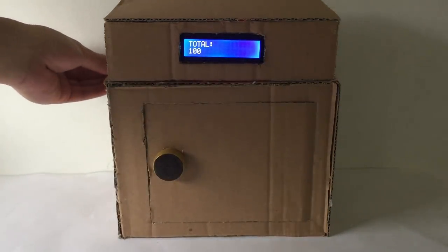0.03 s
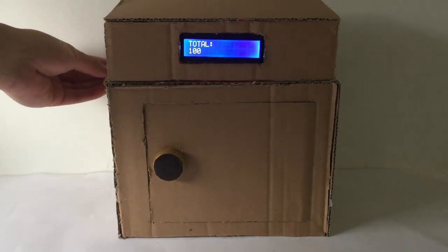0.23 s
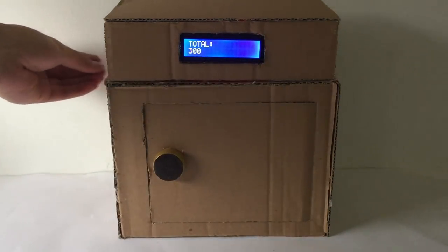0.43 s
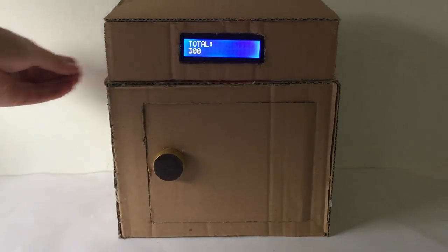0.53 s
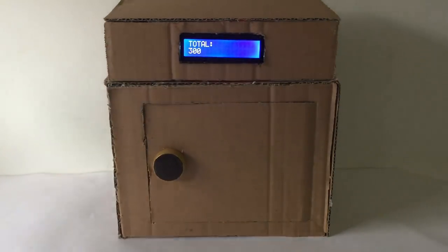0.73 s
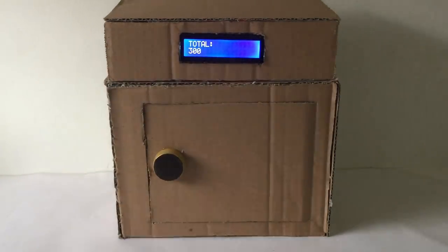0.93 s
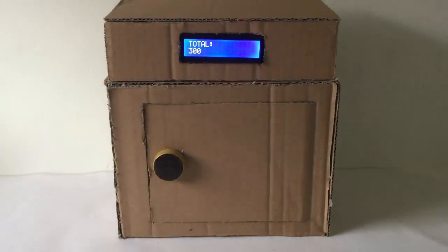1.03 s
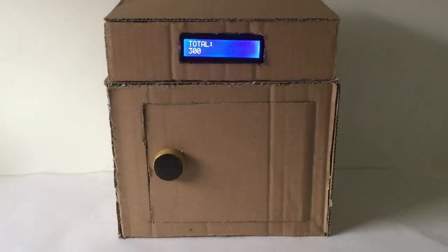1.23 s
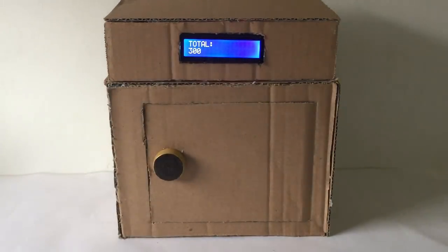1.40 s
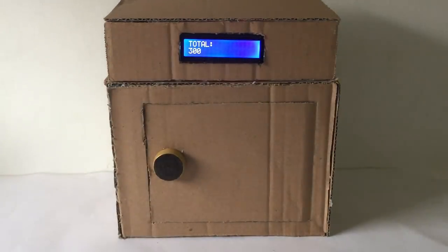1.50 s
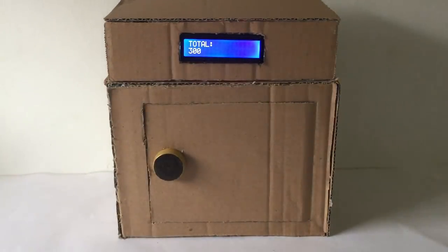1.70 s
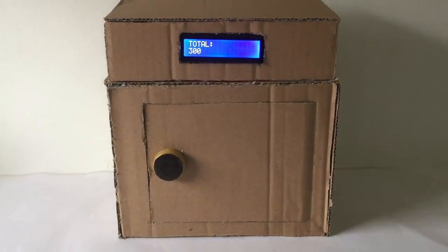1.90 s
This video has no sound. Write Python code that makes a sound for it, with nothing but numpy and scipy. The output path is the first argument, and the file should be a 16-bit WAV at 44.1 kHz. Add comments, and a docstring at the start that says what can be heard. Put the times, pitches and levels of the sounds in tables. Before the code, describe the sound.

In a small, quiet room, a coin drops into a nearby cardboard box. A soft finger thump comes first, then a quick double clack and a short metallic rattle as the coin settles, leaving faint rumble and hiss.

```python
"""A finger bumps a cardboard money box, then a coin pushed through the slot clacks inside.
The coin strikes hard twice, rings very high, skitters and falls flat, which damps the ring.
Each impact excites the cardboard and the air cavity. Low rumble and hiss of a quiet room lie
underneath; a few far tones, faint ticks and a last soft bump come at the end."""
import sys
import numpy as np
from scipy import signal
from scipy.fft import irfft
from scipy.io import wavfile
from scipy.ndimage import uniform_filter1d

SR = 44100
rng = np.random.default_rng(int(sys.argv[2]) if len(sys.argv) > 2 else 0)


def unload_audio(sound):
    """Save the sound as a 16-bit wav file, at the path given as the first command line argument."""
    columns = np.transpose(np.atleast_2d(sound))
    # keep every value between -1 and 1, then stretch to whole-number steps
    steps = np.round(np.clip(columns, -1, 1) * 32767)
    wavfile.write(sys.argv[1], SR, steps.astype(np.int16))


N = 85995
T = np.arange(N) / SR

# dense small resonances of the cardboard: freq_hz, density_db
CLACK_SPECTRUM = [(30, -51.5), (90, -25), (170, -20), (400, 0), (650, -4.5), (1050, -1), (1450, -11),
                  (2350, 1), (3100, -6.5), (3700, 1.5), (4300, -8), (4950, -10), (5900, -16), (8000, -26.5),
                  (16000, -44.5)]
# tick of the coin's edge: freq_hz, density_db
EDGE_SPECTRUM = [(2000, -14), (5500, -13), (7000, 1.5), (7700, -3), (8600, 3), (10300, -5), (12000, 0),
                 (13200, 3), (14800, 16), (15800, -6.5)]
EDGE_T60_S, CONTACT_RISE_S = 0.04, 0.00041


def amp(db):
    """Decibels to gain."""
    return 10 ** (np.asarray(db) / 20)


def unit_rms(x):
    """Scale to rms 1."""
    return x / np.sqrt(np.mean(x ** 2) + 1e-20)


def decay(t_s, t60_s):
    """Exponential fade, 60 dB down at t60_s."""
    return amp(-60 * t_s / t60_s)


def log_interp(points, hz):
    """Interpolate a table on a log-frequency axis."""
    freq_hz, value = np.transpose(points)
    return np.interp(np.log(hz + 1), np.log(freq_hz + 1), value)


def add(mix, start_s, sound):
    """Mix a sound in at start_s."""
    part = mix[max(round(start_s * SR), 0):][:len(sound)]
    part += sound[:len(part)]


def soften(x, rise_s):
    """Linear attack."""
    return x * np.minimum(T[:len(x)] / rise_s, 1)


def noise(spectrum, size):
    """Random-phase noise of the given spectral shape, rms 1."""
    hz = np.fft.rfftfreq(size, 1 / SR)
    phase = np.exp(2j * np.pi * rng.random(len(hz)))
    return unit_rms(irfft(amp(log_interp(spectrum, hz)) * phase, size))


def burst(spectrum, t60_s, size=4096):
    """Dense resonances struck at once, dying together; starts near rms 1."""
    fade = decay(T[:size], t60_s)
    return unit_rms(noise(spectrum, size) * fade) * np.sqrt(np.mean(fade ** 2))


def ring(modes, size=16384):
    """Decaying modes struck from rest with random signs; starts near rms 1."""
    t = T[:size]
    out = sum(amp(db) * decay(t, t60_s) * np.sin(2 * np.pi * hz * t) * rng.choice([-1, 1])
              for hz, db, t60_s in modes)
    return out / np.sqrt(sum(amp(db) ** 2 for _, db, _ in modes) / 2)


def room_rumble():
    """Faint hiss over a low rumble that surges unevenly."""
    spectrum = [(12, -56), (25, -32.5), (40, -15), (62, -0.5), (110, -3.5), (165, -2.5), (215, -15.5),
                (290, -16.5), (340, -21), (490, -25.5), (580, -21.5), (700, -24), (1100, -27), (1450, -28),
                (2800, -31), (6000, -36), (15500, -43)]  # room air: freq_hz, density_db
    surges = [(0.02, 11.5), (0.43, 8.5), (0.48, 5.5), (0.75, 7), (0.81, 10.5), (0.86, 1.5), (0.98, 6.5),
              (1.14, 9), (1.21, 5.5), (1.31, 9), (1.501, 7), (1.601, 8.5), (1.66, 1.5), (1.77, 2.5),
              (1.87, 6.5)]  # rumble swells: centre_s, boost_db
    air_db, rumble_top_hz, surge_width_s = -60, 230, 0.025
    air = noise(spectrum, N)
    rumble = signal.sosfiltfilt(signal.butter(2, rumble_top_hz, fs=SR, output="sos"), air)
    surge_db = sum(db * np.exp(-((T - centre_s) / surge_width_s) ** 2) for centre_s, db in surges)
    return amp(air_db) * (air + rumble * (amp(surge_db) - 1))


def room_echo(x):
    """Diffuse tail of a small room, each band dying at its own rate."""
    decay_times = [(150, .3), (500, .36), (1500, 0.5), (3700, .48), (7000, 0.52), (14500, 0.26)]  # reverberation: freq_hz, t60_s
    colour = [(150, -1), (380, -4.5), (700, 2.5), (1200, 2.5), (1700, 8.5), (2050, -4), (2350, -5.5),
              (2900, 0.5), (3600, -5.5), (4300, -3), (7000, -10), (14500, -2.5)]  # tail response: freq_hz, gain_db
    hz, t, bands = signal.stft(rng.standard_normal(SR), SR, nperseg=256)
    fade = decay(t, log_interp(decay_times, hz)[:, None])
    energy = np.mean(fade ** 2, axis=1, keepdims=True) * SR
    fade *= amp(log_interp(colour, hz))[:, None] / np.sqrt(energy)
    _, tail = signal.istft(bands * fade, SR, nperseg=256)
    return signal.fftconvolve(x, soften(tail, rise_s=0.025))[:N]


def far_tones():
    """Thin wavering tones that barely rise out of the hiss."""
    tones = [(1.388, .16, 995, -72), (1.596, 0.079, 1082, -70), (1.629, .04, 2786, -67.5),
             (1.751, .08, 2830, -73.5)]  # distant tones: start_s, length_s, pitch_hz, level_db
    waver_depth = 0.0117
    out = np.zeros(N)
    for start_s, length_s, pitch_hz, level_db in tones:
        waver = 1 + waver_depth * unit_rms(uniform_filter1d(rng.standard_normal(N), 400))
        arch = np.sin(np.pi * np.clip((T - start_s) / length_s, 0, 1))
        out += amp(level_db) * arch * np.sin(2 * np.pi * np.cumsum(pitch_hz * waver) / SR)
    return out


def handling_ticks():
    """Small dry ticks of handled plastic."""
    ticks = [(1.9018, -49), (1.9110, -55), (1.917, -54), (1.9235, -52), (1.93, -57), (1.9373, -59)]  # contacts: start_s, level_db
    spectrum = [(1000, -39), (2750, -35), (3250, -1), (4200, -1), (5100, -9.5), (6100, -8), (7200, -21),
                (9500, -21), (15000, -26)]  # plastic tick: freq_hz, density_db
    out = np.zeros(N)
    for start_s, level_db in ticks:
        add(out, start_s, amp(level_db) * burst(spectrum, t60_s=0.022))
    return out


def fingers():
    """Fingers brush the slot and bump the wall of the box."""
    rub_spectrum = [(30, -42), (150, -3.5), (300, -11), (560, 1), (800, -9), (1200, -6), (1800, -21.5),
                    (2500, -21.5), (8000, -32), (9700, -27), (11000, -35), (15000, -38)]  # hand on the slot: freq_hz, density_db
    bumps = [(0.002, -64, -57.5), (0.0192, -47, -65.5), (0.0361, -57, -44), (0.0892, -25, -36.5),
             (1.924, -41.5, -55.5)]  # finger contacts: start_s, thump_db, tap_db
    wall_modes = [(111, -9, 0.1), (178.3, -4, .075), (308, -7, 0.053)]  # wall under a soft finger: freq_hz, relative_db, t60_s
    tap_spectrum = [(25, -38), (90, -13), (330, 1), (560, 4.5), (760, -19.5), (1050, -8), (1220, -7),
                    (1450, -21), (1850, -17.5), (2300, -36), (6000, -31), (9500, -42.5), (15000, -46.5)]  # finger tap: freq_hz, density_db
    rub_db, rub_end_s = -54.5, 0.08
    out = amp(rub_db) * noise(rub_spectrum, N) * np.clip(1 - T / rub_end_s, 0, 1)
    for start_s, thump_db, tap_db in bumps:
        add(out, start_s, amp(thump_db) * soften(ring(wall_modes), rise_s=0.012))
        add(out, start_s, amp(tap_db) * soften(burst(tap_spectrum, t60_s=0.05), CONTACT_RISE_S))
    return out


def coin_skitter():
    """Tiny random contacts as the coin's rim runs over the cardboard."""
    start_s, end_s, contacts_per_s = 0.24, 0.325, 700
    clack_db, tick_db = -42.5, -57.5
    impulses = rng.exponential(1, N) * (rng.random(N) < contacts_per_s / SR)
    contacts = unit_rms(impulses) * (T > start_s) * (T < end_s)
    clack, tick = burst(CLACK_SPECTRUM, t60_s=0.013), burst(EDGE_SPECTRUM, EDGE_T60_S)
    response = amp(clack_db) * clack / np.linalg.norm(clack) + amp(tick_db) * tick / np.linalg.norm(tick)
    return signal.fftconvolve(contacts, response)[:N]


def coin_impacts():
    """Each impact clacks the cardboard, thuds the cavity and rings the coin; lying flat damps the ring."""
    impacts = [(0.2069, -18.5, 0.054, -36, -31.5, -41), (0.2136, -31.5, 0.023, -34.5, -37, -37),
               (0.2285, -17, 0.044, -29.5, -31.5, -20.5), (0.2313, -23, 0.023, -35, -35.5, -47),
               (0.2401, -39.5, .015, -32, -53, -40), (0.2474, -29.5, .015, -48, -48, -48),
               (0.2490, -37, .015, -51, -37.5, -35), (0.2660, -40.5, 0.027, -54, -42, -37),
               (0.2835, -31.5, 0.031, -44, -58, -41), (0.2893, -42.5, 0.049, -61, -69, -54),
               (0.304, -57, 0.038, -55, -47, -41), (0.326, -66, 0.026, -35.5, -58, -49),
               (0.3287, -29.5, 0.032, -36, -39.5, -36.5), (0.341, -40.5, 0.043, -47, -49.5, -60),
               (0.3500, -54, 0.022, -50, -63, -61)]  # coin on box: start_s, clack_db, clack_t60_s, thud_db, tick_db, ring_db
    box_modes = [(580.3, -3, 0.023), (695, -11, 0.13), (928, -19, .12), (1203.3, -10, 0.17),
                 (1635, -11, .14), (2053, -13, 0.12), (2324, 1, .05), (2323, 4, 0.044), (2630, -7, 0.066),
                 (3030, -5.5, .04), (3468, -5, 0.03), (3607, 1.5, 0.063), (4870, 0, .025),
                 (5445, -14, 0.023)]  # cardboard: freq_hz, relative_db, t60_s
    cavity_modes = [(154, -7.5, 0.12), (243.4, -9.5, 0.036), (331, -6, 0.046), (356, -5.5, 0.066),
                    (409.5, -5.5, 0.043)]  # enclosed air and walls: freq_hz, relative_db, t60_s
    coin_modes = [(14115, -10, .1), (14160, -13, .16), (14415, -12, .24), (14540, -11, .16),
                  (14637, -13, .2), (14720, -11, .07), (14893, 0, .17)]  # metal disc: freq_hz, relative_db, t60_s
    shimmer_spectrum = [(11000, -63), (13700, -23), (14100, 1.5), (14330, -1), (14600, -21), (14950, -13),
                        (15200, -7), (15800, -31)]  # coin ring scattered by the walls: freq_hz, density_db
    dense_db, modal_db, shimmer_db = -3.5, -5, -4.5
    flat_at_s, flat_t60_s = 0.3, 0.053
    box, metal = np.zeros(N), np.zeros(N)
    for start_s, clack_db, clack_t60_s, thud_db, tick_db, ring_db in impacts:
        clack = amp(dense_db) * burst(CLACK_SPECTRUM, clack_t60_s, size=16384)
        clack += amp(modal_db) * ring(box_modes)
        add(box, start_s, amp(clack_db) * soften(clack, CONTACT_RISE_S))
        add(box, start_s, amp(thud_db) * soften(ring(cavity_modes), rise_s=0.003))
        add(box, start_s, amp(tick_db) * burst(EDGE_SPECTRUM, EDGE_T60_S))
        tone = ring(coin_modes) + amp(shimmer_db) * burst(shimmer_spectrum, t60_s=0.12, size=16384)
        lying_s = np.maximum(T[:len(tone)] - max(flat_at_s - start_s, 0), 0)
        add(metal, start_s, amp(ring_db) * soften(tone, CONTACT_RISE_S) * decay(lying_s, flat_t60_s))
    return box, metal


def scene():
    """Coin, fingers and ticks with their echo, over rumble and far tones; mono."""
    box_send_db, metal_send_db, ticks_send_db = -7.5, -9, 0.5
    knocks, metal = coin_impacts()
    box = knocks + coin_skitter() + fingers()
    ticks = handling_ticks()
    echo = room_echo(amp(box_send_db) * box + amp(metal_send_db) * metal + amp(ticks_send_db) * ticks)
    return (box + metal + ticks + echo + room_rumble() + far_tones())[None]


def record(dry):
    """Steep low-pass on the top treble."""
    cutoff_hz = 15800
    lowpass = signal.firwin(255, cutoff_hz, window=("kaiser", 9), fs=SR)
    return signal.oaconvolve(dry, lowpass[None], "same")


dry = scene()
out = record(dry)
unload_audio(out)
```